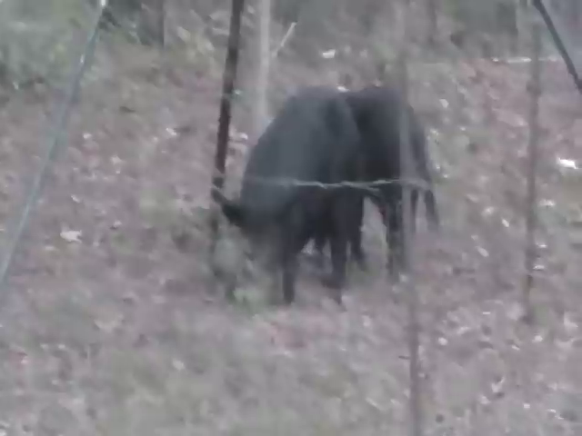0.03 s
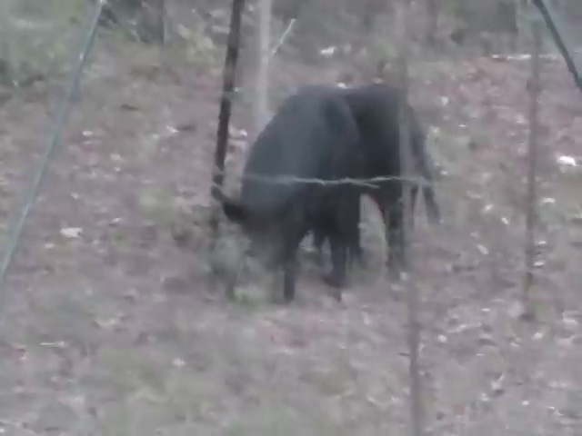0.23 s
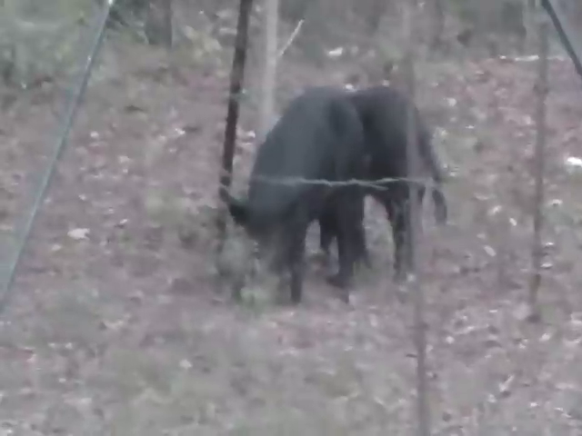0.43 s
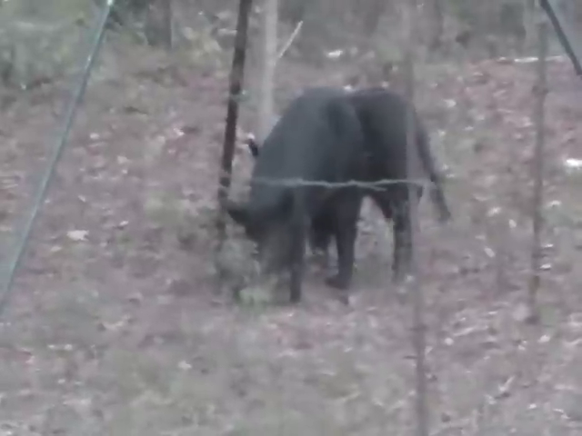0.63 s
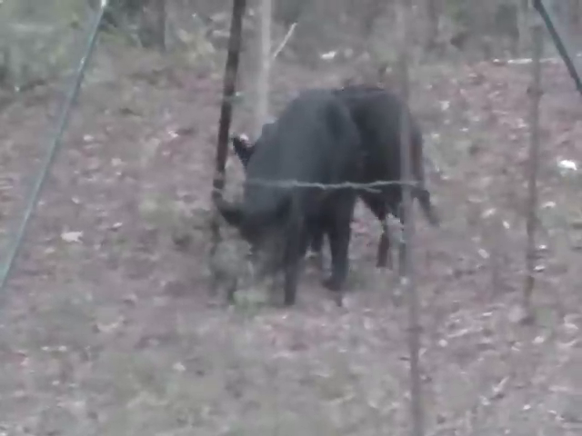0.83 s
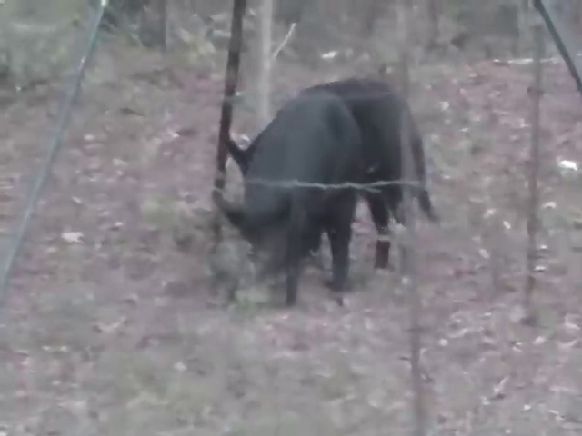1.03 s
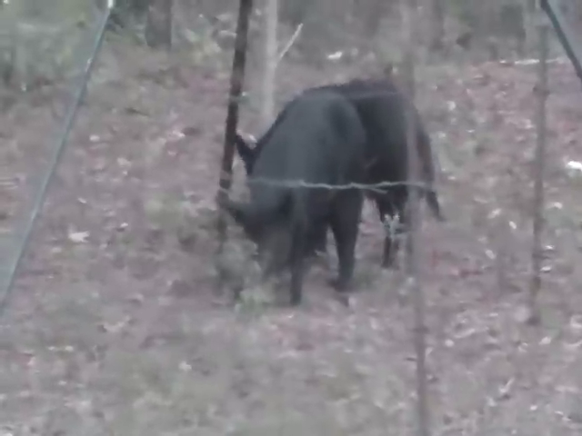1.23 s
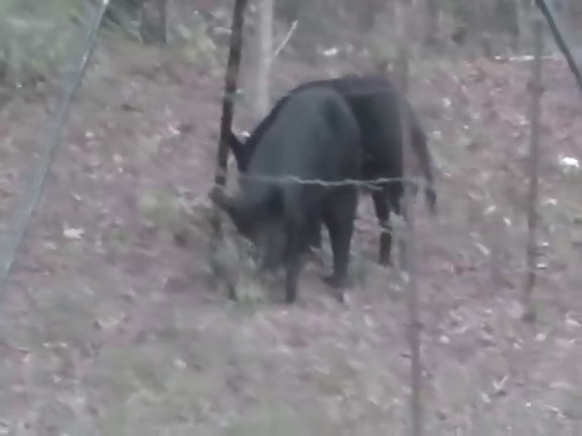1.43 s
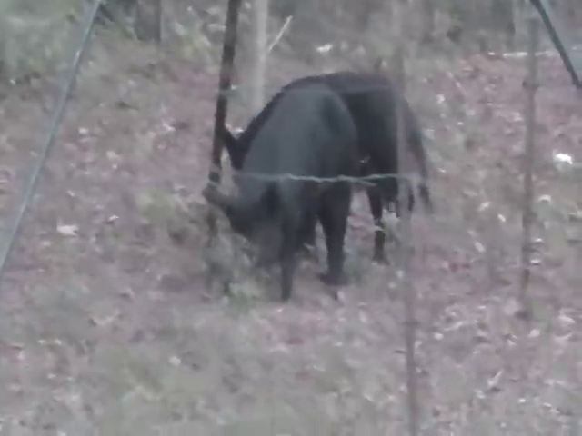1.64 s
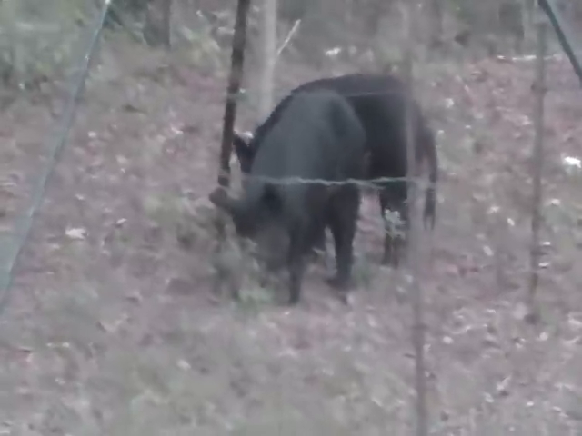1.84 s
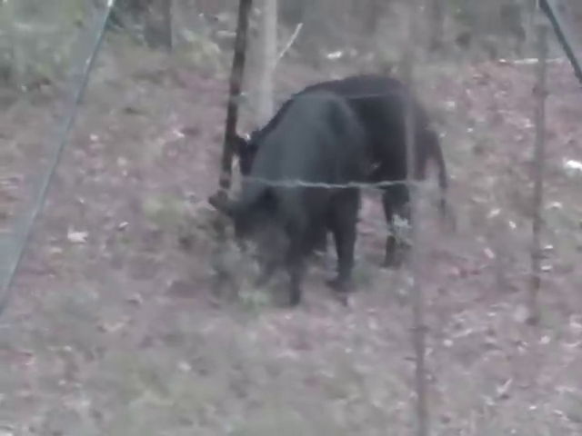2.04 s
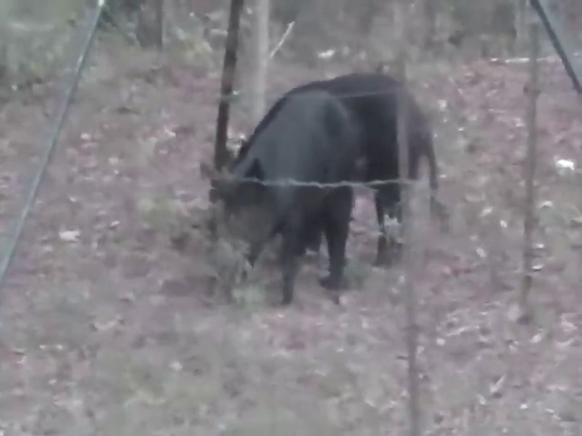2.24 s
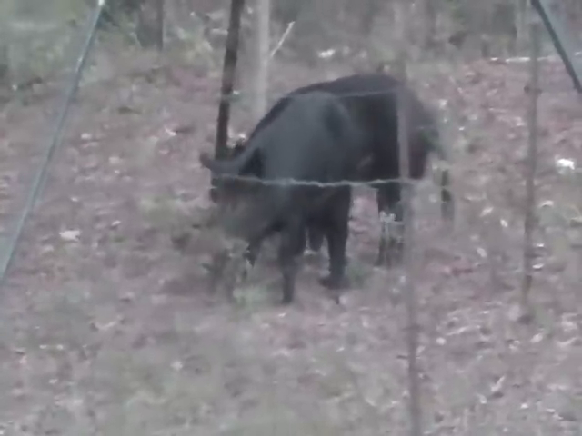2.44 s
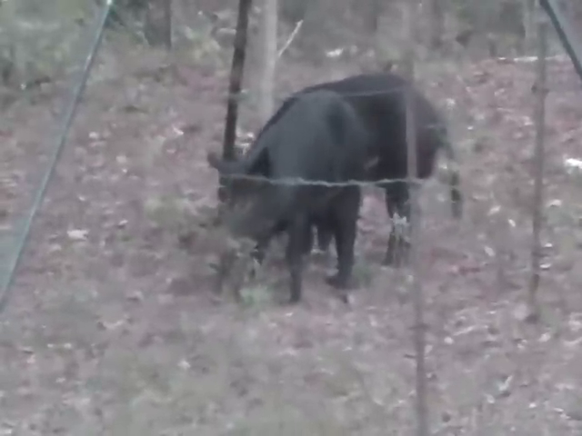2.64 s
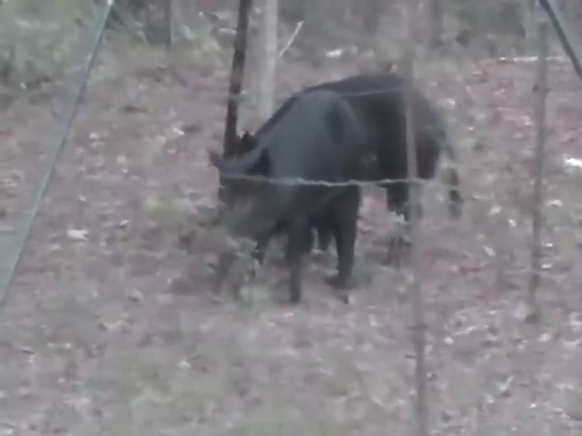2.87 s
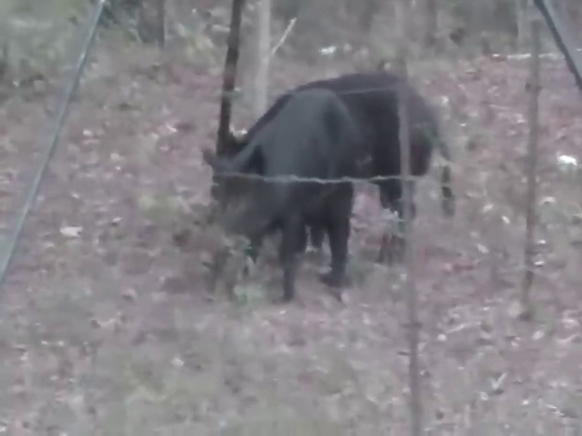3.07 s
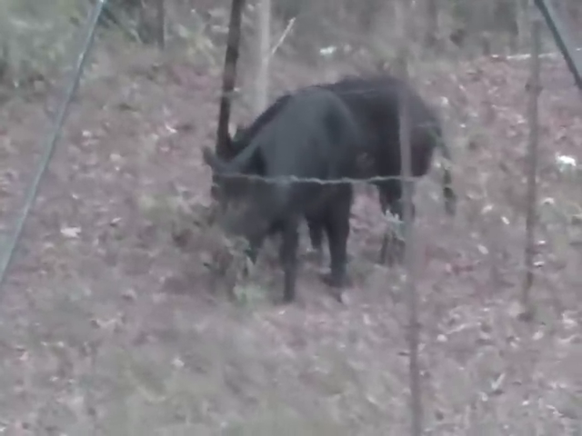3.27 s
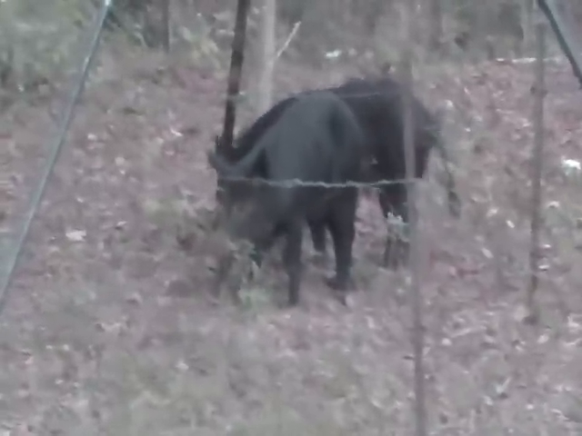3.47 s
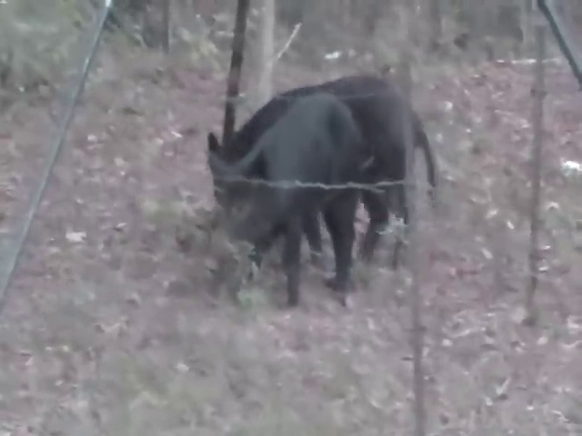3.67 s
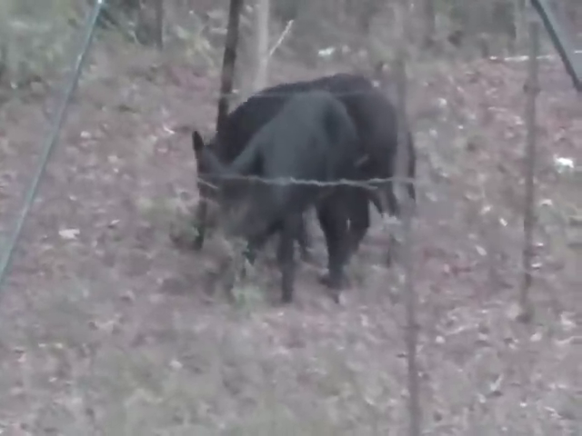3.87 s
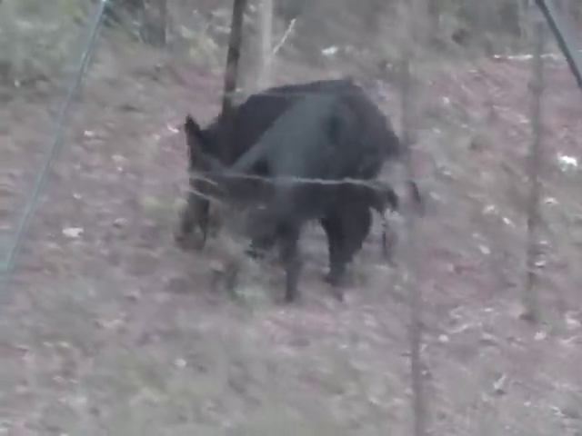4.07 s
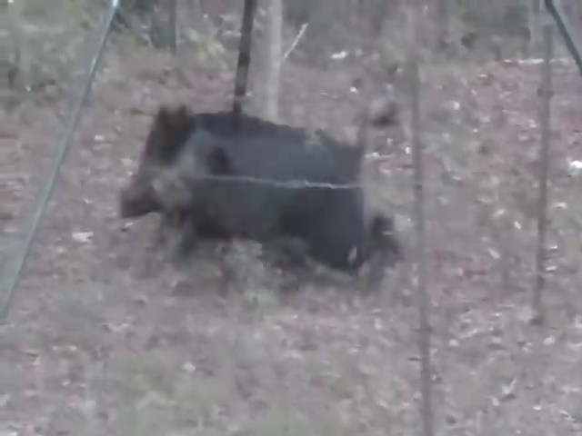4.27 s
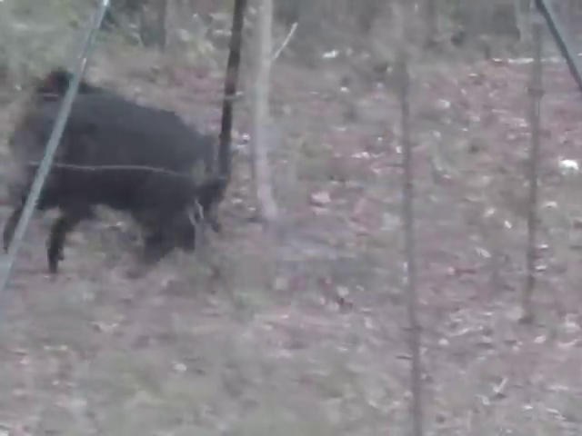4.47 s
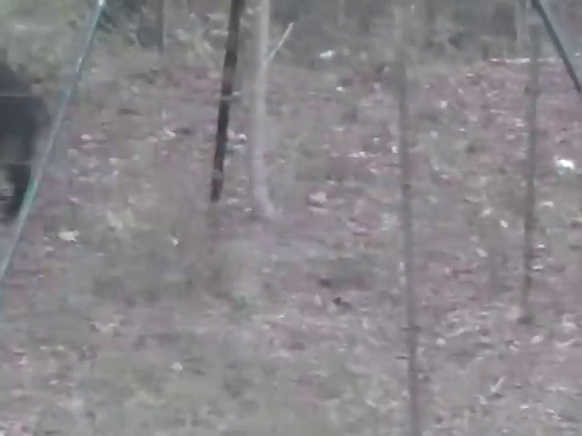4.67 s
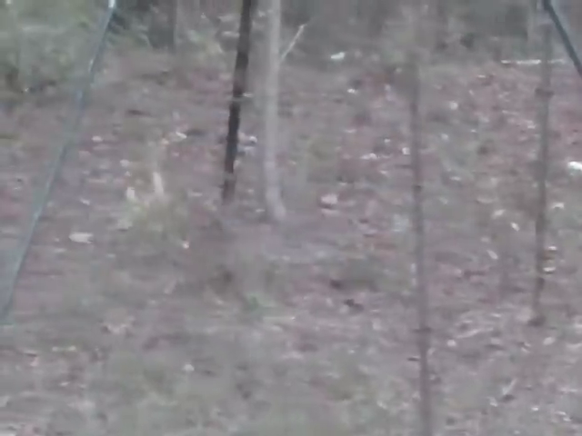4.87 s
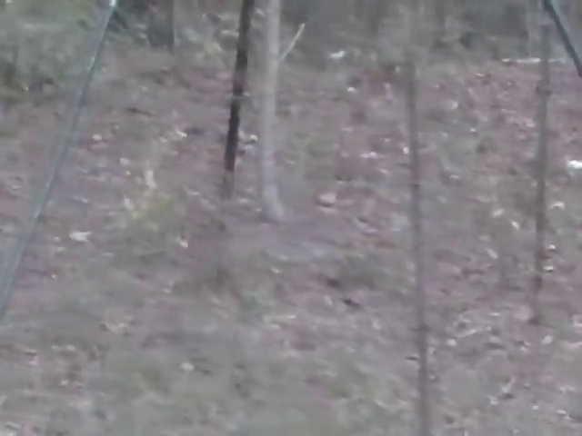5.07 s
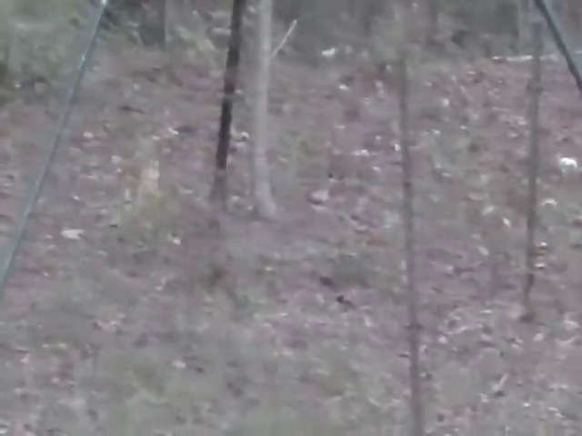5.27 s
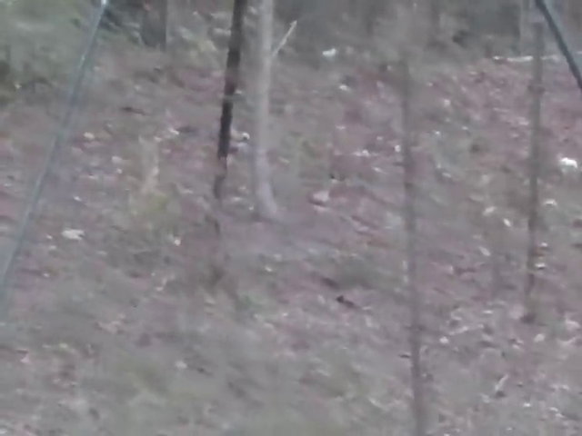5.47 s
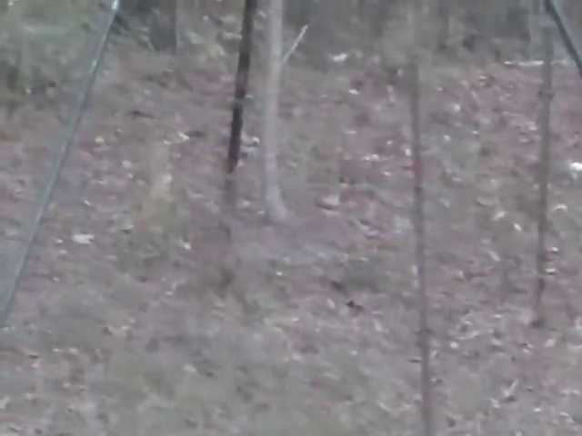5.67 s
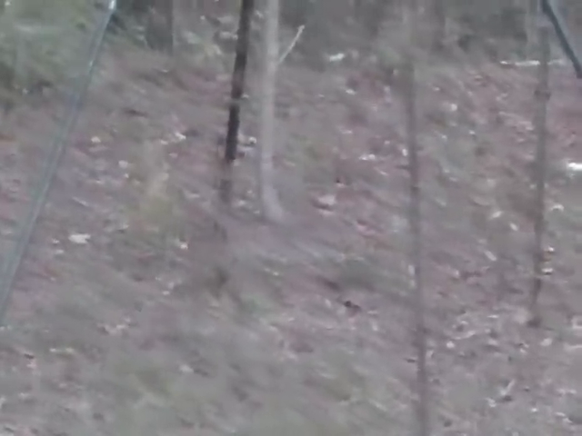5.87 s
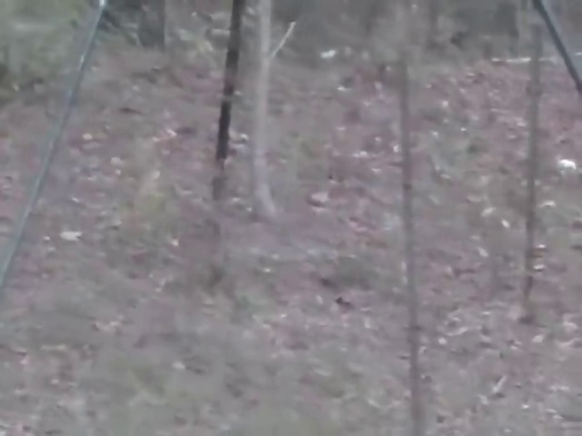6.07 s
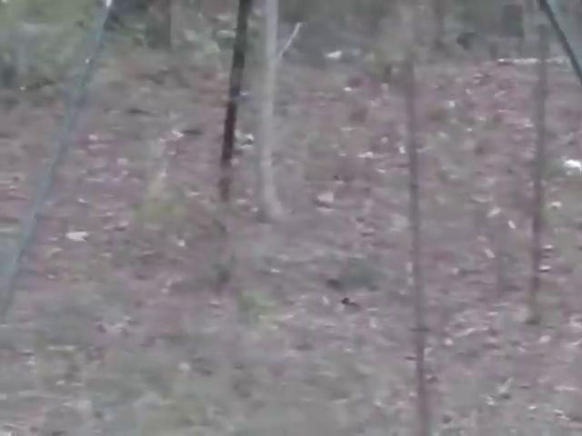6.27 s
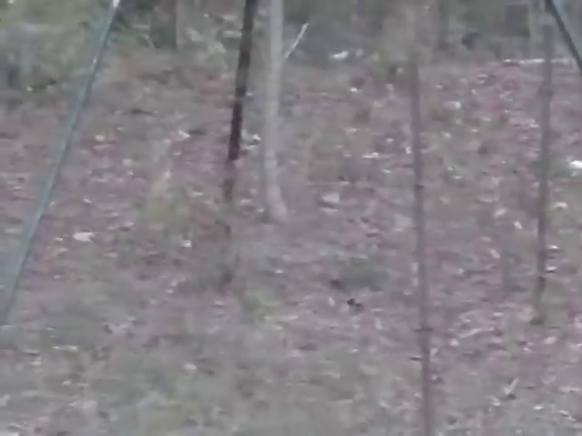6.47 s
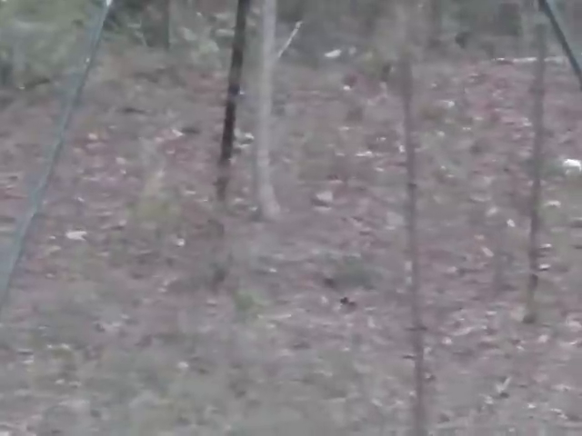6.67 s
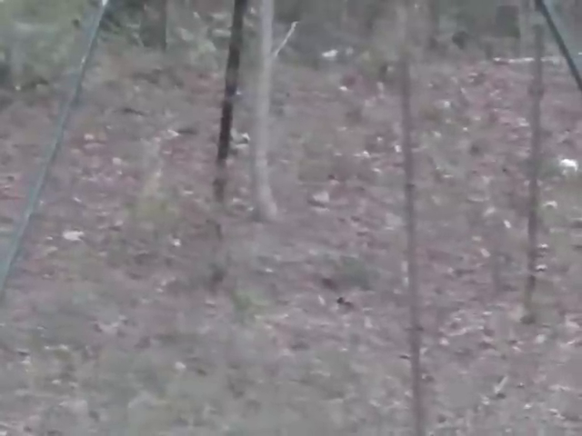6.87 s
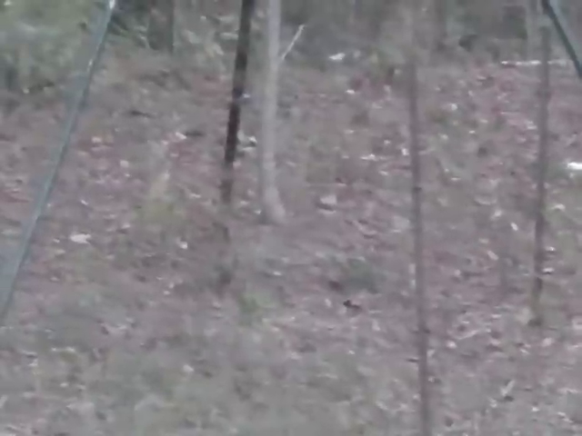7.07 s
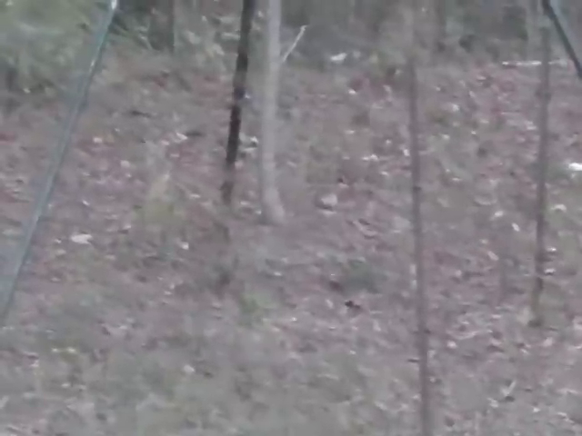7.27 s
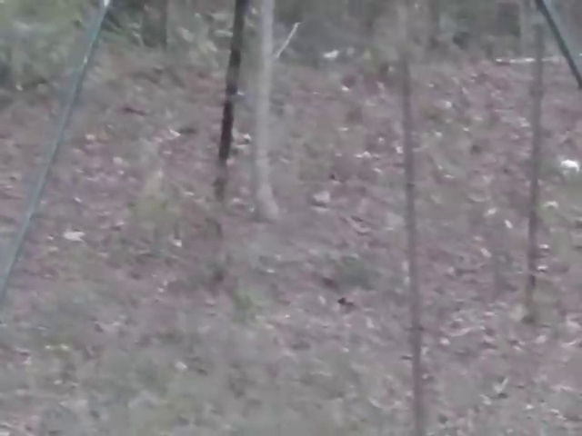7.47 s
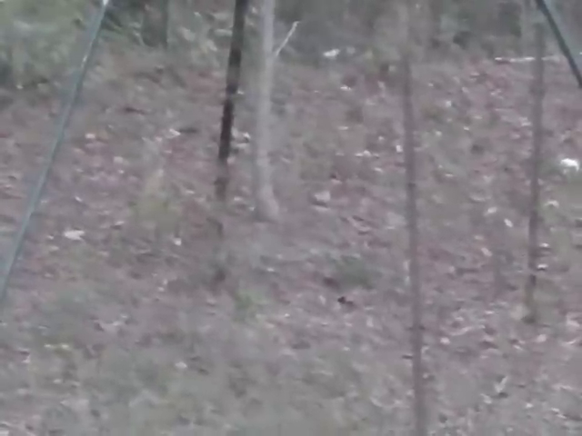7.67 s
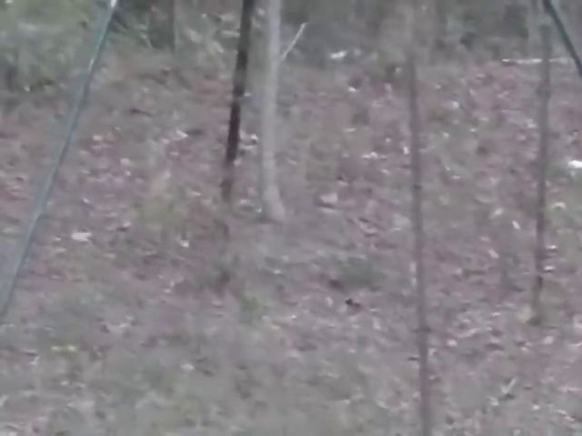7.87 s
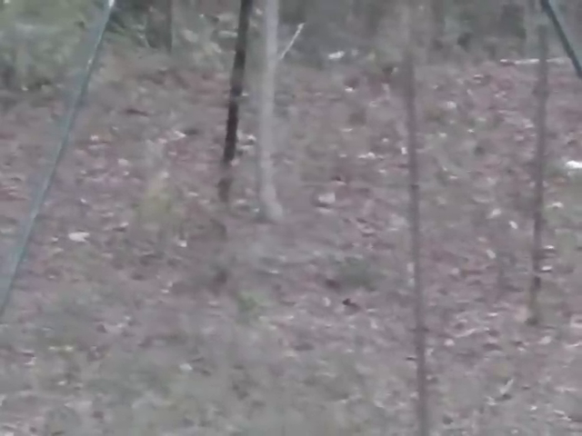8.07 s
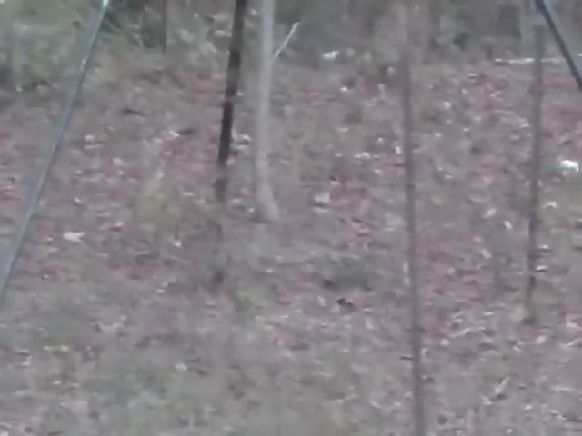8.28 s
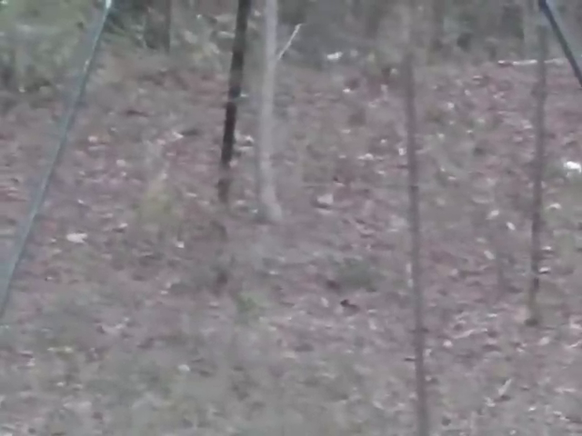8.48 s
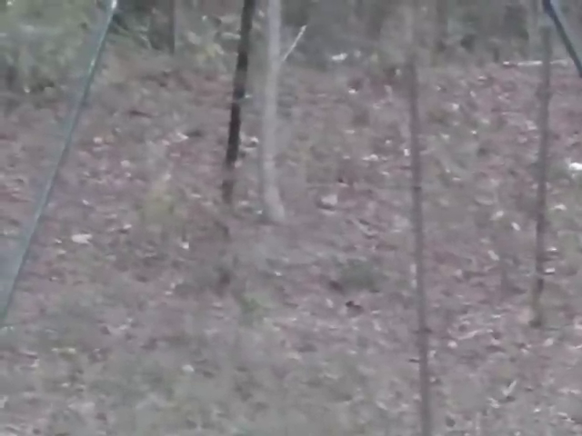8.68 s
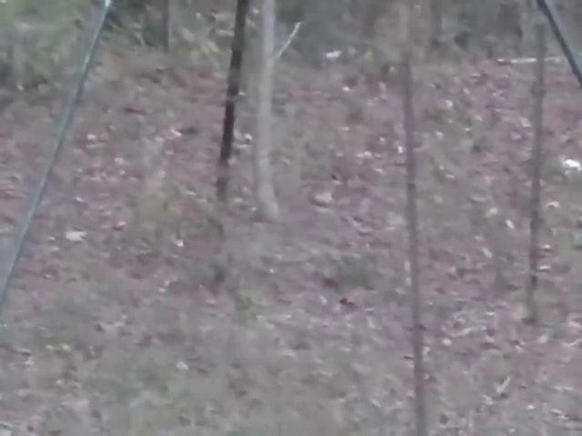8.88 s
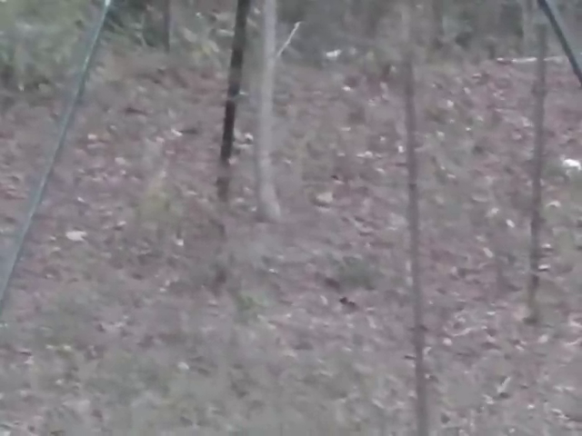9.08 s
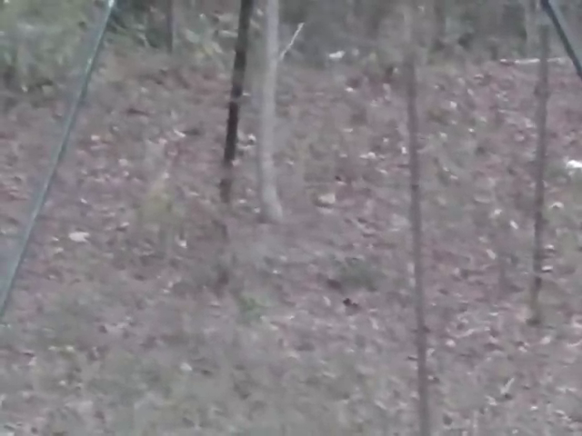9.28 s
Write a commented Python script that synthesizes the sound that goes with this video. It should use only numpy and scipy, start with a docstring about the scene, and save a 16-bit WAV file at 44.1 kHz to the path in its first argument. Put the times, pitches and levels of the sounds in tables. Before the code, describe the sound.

In a quiet wood, crickets trill over a soft airy hush while wild hogs gently rustle dry leaves and tick small twigs. A compound bow fires very close to the microphone with a sharp metallic crack and short throbbing twang. Half a second later the arrow smacks home farther off; the hogs bolt, one squeals briefly, a branch snaps loudly, and crackling footfalls recede among echoing trees.

```python
"""A wood with crickets, small birds and a faint far engine, made of falling tones, whistles, hush and a hum.
Wild hogs root in dry leaves: countless tiny clicks, coloured as leaves, stems and ground, plus thuds and twigs.
At 3.7 s a compound bow fires close by: noise cracks ring its frame, and the string twangs in throbs.
The arrow strikes half a second later and the hogs bolt through the brush. One squeals: ragged pulses and
whistles in two throat resonances. A branch breaks in noise cracks, and the herd fades among the trees."""
import sys
import numpy as np
from scipy import signal
from scipy.fft import rfft, irfft
from scipy.io import wavfile

SR = 44100
rng = np.random.default_rng(int(sys.argv[2]) if len(sys.argv) > 2 else 0)


def dump(signal):
    """Clip the signal to [-1, 1] and save it as 16-bit WAV at the path in sys.argv[1]."""
    limited = np.clip(np.atleast_2d(signal).T, -1, 1)
    pcm = np.round(limited * 32767).astype(np.int16)
    wavfile.write(sys.argv[1], SR, pcm)


N = 410571
TIME = np.arange(N) / SR

# In all tables t60/s is the time a sound takes to fall by 60 dB.
# Colours give only the shape of a spectrum; their overall power is evened out.

# colour of the still air: f/Hz, level per Hz/dB
AIR_COLOUR = [(25, -7.5), (60, -4), (110, -0.5), (200, -4.5), (330, -8), (480, -7), (800, -8),
              (2000, -12.5), (3800, -18.5), (6500, -18.5), (10000, -20.5), (15500, -28.5)]
# loudness of a far engine: t/s, level/dB
ENGINE = [(1.4, -83), (2.4, -72), (4.2, -69), (6, -80), (9.3, -75)]
# how wide a sound is, side against middle: f/Hz, level/dB
WIDE = [(60, -5), (200, 7), (700, 8), (2400, 7), (4400, 7.5), (8000, -2.5), (15000, 1)]
SCATTERED = [(100, -14), (500, -12), (1300, -14.5), (2400, -12), (4400, -18), (8000, -21), (15000, 1.5)]
NARROW = [(100, -12), (300, -17), (2000, -14.5), (5000, -25), (9000, -16), (14000, -2.5)]
# colour of what trunks and leaves send back: f/Hz, level/dB
FOLIAGE = [(60, -7), (250, -4.5), (600, 3), (1500, -1), (5000, -3), (9000, 2.5), (15000, -2.5)]

# irregular cricket chirps: t/s, strokes, f/Hz, level/dB
CHIRPS = [(.008, 5, 3260, -61.5), (.100, 2, 5010, -67), (.632, 4, 3090, -61), (.940, 2, 5010, -67),
          (1.270, 5, 3290, -62.5), (2.477, 4, 3100, -63), (3.354, 5, 3270, -63), (3.555, 3, 3090, -63.5),
          (7.770, 2, 4650, -57)]
CHIRP_SPACING_S, CHIRP_FALL_HZ = .044, 210
SWELL_DB = 5  # a chirp grows by about this much from first stroke to last
# a cricket trilling on one pitch: t/s, strokes
TRILLS = [(.502, 6), (2.736, 10)]
TRILL_SPACING_S, TRILL_HZ, TRILL_DB = .0205, 3343, -63
# crickets calling like clockwork, two strokes each: first t/s, period/s, f/Hz, fall in a stroke/Hz, level/dB
CALLERS = [(.203, .797, 4970, 400, -57), (.400, .649, 5380, 620, -61.5)]
PAIR_S = .038  # between the two strokes

# pushes through the litter, gentle in rooting, hard in running:
# t/s, hold/s, leaves level/dB, stems against leaves/dB, ground against leaves/dB (before each layer's trim)
SHOVES = [(0.198, .23, -64.5, 2.5, 3), (0.557, 0.36, -72, -3, 5), (0.973, 0.073, -58.5, -5, -8.5),
          (1.154, 0.73, -67, -2, -1.5), (2.043, 0.45, -75, 0.5, 6), (2.847, .04, -65.5, -3.5, -17),
          (3.534, 0.082, -70, 3, -2), (4.273, 0.088, -50, -1, -3), (4.515, 0.17, -45, -6, -13),
          (4.792, 0.12, -45, -5, -11), (5.018, .04, -41.5, -4.5, -16), (5.121, 0.084, -31.5, -13, -23),
          (5.194, 0.067, -28.5, -9.5, -36), (5.533, 0.096, -47.5, -10, -11.5),
          (5.818, 0.12, -44, -11.5, -14.5), (6.172, 0.28, -44, -10.5, -19), (6.515, 0.13, -49.5, -9, -27),
          (6.892, 0.16, -54.5, -7, -10), (7.01, 0.33, -51.5, -5, -8), (7.457, 0.19, -52.5, -4, -11),
          (7.72, 0.32, -54.5, -3, -14.5), (8.251, 0.24, -51, -6.5, -19), (8.61, .19, -55.5, -6.5, -14),
          (8.987, 0.25, -52.5, -7.5, -11.5)]
SHOVE_ATTACK_S, SHOVE_RELEASE_DB_PER_S = 0.027, 83
STIR_DB = -75.5  # the litter is never quite still
# the running herd; stems and ground are against the leaves
BOLT_S, GATHER_S, HERD_DB, HERD_FADE_DB_PER_S = 4.16, 1.0, -47.5, 3.5
HERD_STEMS_DB, HERD_GROUND_DB = -7, -10
RETREAT_S = 5.4  # from the bolt until the herd is far off
# colours of the litter layers: f/Hz, level per Hz/dB
LEAVES = [(1200, -33.5), (2500, -2), (3600, -3), (4500, 3), (6500, -1), (9000, -7.5), (12000, -18.5),
          (15500, -25.5)]
STEMS = [(300, -23.5), (700, -8.5), (1300, 1.5), (2400, -0.5), (3500, -3), (7000, -36)]
GROUND = [(30, -20), (70, -2), (130, 1), (360, -2.5), (490, 0), (640, -3.5), (900, -5.5), (2000, -30)]
# what distance does to the leaves: f/Hz, gain/dB
FAR_LOSS = [(100, 4), (8000, 0), (11500, -4.5), (15500, -2)]

# hooves and bumps on soft ground, and the low knock of the arrow's strike at 4.197 s: t/s, starting level/dB,
# f/Hz (the pitch sinks from 1.35 f to 0.76 f)
THUDS = [(0.289, -48, 302), (1.2638, -37.5, 310), (4.197, -27, 380), (4.541, -40, 347), (4.631, -42, 290),
         (4.705, -41, 320), (5.056, -40, 338), (6.191, -47, 300)]
# bird calls: t/s, length/s, start f/Hz, end f/Hz, level/dB, waver/Hz
BIRDS = [(0.459, 0.019, 6300, 8400, -59.5, 20), (.80, 0.19, 8500, 8100, -73, 300),
         (0.825, 0.26, 9400, 9200, -77, 240), (1.286, .08, 8100, 7800, -70, 200),
         (1.514, 0.14, 7400, 7150, -70.5, 170), (1.705, 0.017, 5900, 8700, -56.5, 20),
         (1.73, .09, 7700, 7650, -71, 130), (3.15, 0.1, 7560, 6800, -71, 200),
         (3.21, .11, 7100, 7400, -75, 350)]
# the louder twigs, and the branch's first cracks at 5.14-5.2 s before it breaks: t/s, level/dB, t60/s, centre
# f/Hz
TWIG_SNAPS = [(.598, -51, .01, 2760), (1.592, -51, .008, 2200), (2.432, -58, .02, 1500),
              (2.545, -50, .008, 3000), (2.862, -58, .02, 1500), (2.900, -57, .03, 1300),
              (3.278, -50.5, 0.0071, 3730), (3.425, -58, .03, 1400), (3.5125, -46.5, 0.0056, 2300),
              (5.137, -30.5, .034, 4970), (5.1614, -28, .015, 4700), (5.199, -18, 0.0087, 4900),
              (5.859, -39, 0.039, 5230), (6.190, -37, .044, 2800), (6.289, -38, .03, 2500),
              (6.326, -37.5, 0.017, 1400), (6.5768, -24, 0.0031, 5340), (7.176, -23, 0.0021, 5700),
              (7.613, -36.5, .006, 5000), (7.963, -38.5, 0.0089, 3200), (8.1331, -39, 0.0085, 5600),
              (8.2795, -38.5, .025, 4660), (8.427, -30, 0.006, 4520)]

# blows in the bow, from release to the string's stop: t/s, level before the frame/dB, t60/s
BOW_BLOWS = [(3.6752, -31, 0.12), (3.6865, -36.5, 0.068), (3.6912, -19, .04), (3.6944, -9, 0.04),
             (3.6966, -9, 0.034), (3.7045, -17.5, 0.055), (3.7098, -10.5, 0.025), (3.7165, -16.5, .08),
             (3.745, -30, 0.28)]
# resonances of riser, cams and arrow rest: f/Hz, width/Hz, level against each other/dB
BOW_MODES = [(1037, 42, 0), (1260, 84, -7), (1514, 34, -4.5), (2180, 120, 0.5), (2400, 290, 0.5),
             (2625, 82, -8), (2730, 60, -1.5), (3280, 130, -14), (3950, 98, -0.5), (4150, 220, 3.5),
             (4730, 130, -3), (6070, 130, -5)]
# colour of the bow's crack: f/Hz, level per Hz/dB
BOW_CRACK = [(40, -18.5), (90, -8.5), (180, -2), (400, 2.5), (900, 0.5), (1800, -3), (4200, -3.5),
             (6500, -9.5), (8500, -9), (11000, -17.5), (15500, -22)]
# string and limbs: f/Hz, level against each other/dB, pitch wobble/Hz
TWANG = [(209, -24, 26.4), (425, -15, 30), (556, -1.5, 13), (711, -9, 22)]
# loose parts chattering as the bow settles: t/s, level/dB, t60/s, centre f/Hz
RATTLES = [(3.6755, -31, 0.022, 2980), (3.739, -28, 0.039, 5960), (3.7535, -24, 0.023, 4500),
           (3.7775, -16, 0.0073, 3900), (3.8060, -21, 0.009, 3460), (3.8225, -32, 0.022, 4450)]
# the string's swing dies away in throbs
SWING_S, SWING_DB, SWING_ATTACK_S, SWING_FADE_DB_PER_S = 3.713, -8.5, 0.0073, 289.5
THROB_HZ, THROB_DB = 23.5, 12.5
# the trees' answer to a loud crack, and the dull roll among distant trunks: f/Hz, level per Hz/dB
ECHO_COLOUR = [(60, -13), (200, -6.5), (550, -10.5), (900, -10.5), (1500, 1), (2500, 1), (4500, 4.5),
               (6500, 2.5), (9000, -3.5), (12000, -14.5), (15500, -18.5)]
ROLL_COLOUR = [(40, -20), (150, -6), (450, 1), (1100, -1.5), (2000, -9.5), (5000, -34)]

# the arrow's strike: t/s, level/dB, t60/s
STRIKE = [(4.1917, -24, 0.025), (4.1938, -12, .009), (4.1982, -21.5, 0.037), (4.2135, -29.5, 0.049)]
# colour of the strike: f/Hz, level per Hz/dB
STRIKE_COLOUR = [(80, -12), (300, -3.5), (700, -4), (1500, -6.5), (2700, 4), (4000, -1.5), (6000, 4),
                 (9000, -0.5), (12000, -10.5), (15500, -21)]

# a squeal, then a faint one from far off: t/s, length/s, level/dB, lower throat f/Hz, upper throat f/Hz,
# sinking of the upper resonance/octaves per s
SQUEALS = [(4.619, .31, -46.3, 1152, 2200, 1.8), (7.73, .29, -63, 1320, 1600, .7)]
SQUEAL_ATTACK_S, LOWER_RELEASE_DB_PER_S, UPPER_RELEASE_DB_PER_S = .13, 110, 600
# the lower resonance sinks at its own rate and sounds a little later
LOWER_SINK_OCT_PER_S, LOWER_LAG_S, UPPER_DB = 0.55, 0.031, 3.5

# the branch breaking: t/s, level/dB, t60/s
BREAK = [(5.2263, -8, 0.021), (5.231, -20, 0.032), (5.239, -30, .01), (5.2455, -23, 0.014)]
# colour of the break: f/Hz, level per Hz/dB
BREAK_COLOUR = [(47, -61), (80, -38), (294, -12), (556, -21.5), (774, -5), (944, -13), (1570, -1.5),
                (3310, -5.5), (4410, 2.5), (7010, -2.5), (15500, -38)]

TOP_HZ = 15850  # nothing much is heard above this


def undb(db):
    """Turn decibels into gain."""
    return 10 ** (np.asarray(db) / 20)


def unit(x):
    """Scale to an average strength (rms) of 1."""
    return x / np.sqrt(np.mean(x ** 2) + 1e-20)


def add(out, s, sound):
    """Mix a sound in at a given time in seconds."""
    i = max(int(s * SR), 0)
    n = max(min(sound.shape[-1], N - i), 0)
    out[..., i:i + n] += sound[..., :n]


def walk(rate, size=N):
    """Smooth chance: straight lines between random points, `rate` points a second."""
    knots = rng.standard_normal(int(size / SR * rate) + 2)
    return np.interp(np.arange(size) / SR * rate, np.arange(len(knots)), knots)


def tint(x, spectrum, keep_power=True, size=2048):
    """Colour a sound through (f/Hz, level/dB) points, without any sound before its cause."""
    hz, db = np.transpose(spectrum)
    gain = undb(np.interp(np.log(np.fft.rfftfreq(size, 1 / SR) + 1), np.log(hz), db))
    # folding the cepstrum forward in time gives the filter its minimum phase
    cepstrum = irfft(np.log(unit(gain) if keep_power else gain))
    cepstrum[1:size // 2] *= 2
    cepstrum[size // 2 + 1:] = 0
    return signal.oaconvolve(x, irfft(np.exp(rfft(cepstrum))))[:len(x)]


def ring(x, hz, width):
    """One resonance, gain 1 at its centre."""
    b, a = signal.iirpeak(min(hz, SR / 2 - 1), hz / min(width, SR / 4), fs=SR)
    return signal.lfilter(b, a, x)


def lowpass(x, hz):
    """Keep what lies below a frequency."""
    return signal.sosfilt(signal.butter(2, hz, fs=SR, output="sos"), x)


def spread(mid, side, width, pan_db=0):
    """Left and right from two unrelated sounds."""
    side = tint(side, width, keep_power=False)
    return np.array([mid + side, mid - side]) * undb(np.array([[pan_db], [-pan_db]]) / 2)


def decay(t, t60):
    """An even dying away, by 60 dB in t60 seconds."""
    return np.exp(-np.log(1000) * t / t60)


def burst(t60):
    """A crack: noise that starts at once and dies quickly."""
    t = np.arange(SR // 8) / SR
    return rng.uniform(-1.07, 1, len(t)) * np.sqrt(3) * decay(t, t60)  # slightly lopsided noise


def blows(rows):
    """A noise crack for each row of (t/s, level/dB, t60/s)."""
    out = np.zeros(N)
    for s, db, t60 in rows:
        add(out, s, undb(db) * burst(t60))
    return out


def snaps(rows, breadth):
    """A crack with its own pitch for each row of (t/s, level/dB, t60/s, f/Hz)."""
    out = np.zeros(N)
    for s, db, t60, hz in rows:
        crack = burst(t60)
        snap = ring(ring(crack, hz, breadth * hz), hz, breadth * hz)
        add(out, s, undb(db) * snap * np.std(crack) / np.std(snap))
    return out


def woods(x, t60, treble_loss=0.87):
    """Echoes scattered by trunks and leaves: they build up, then fade, the treble sooner."""
    t = np.arange(2 * SR) / SR
    fade = decay(t, t60)
    tails = []
    for _ in range(2):
        uneven = rng.standard_normal(len(t)) * undb(2.4 * rng.standard_normal(len(t)))
        echoes = tint(uneven, FOLIAGE)
        low = lowpass(echoes, 4500)
        tail = fade * (low + (echoes - low) * fade ** treble_loss) * (1 - np.exp(-t / 0.023))
        tails.append(signal.oaconvolve(x, tail / np.linalg.norm(tail))[:N])
    return spread(*tails, SCATTERED)


def afterglow(x, colour, t60, treble_t60):
    """Countless unrelated echoes of a loud crack: its energy dies away as smooth noise, treble first."""
    def fading(t60):
        keep = np.exp(-2 * np.log(1000) / (t60 * SR))
        return np.sqrt(signal.lfilter([1 - keep], [1, -keep], x ** 2))
    tails = []
    for _ in range(2):
        echoes = tint(rng.standard_normal(N), colour)
        low = signal.sosfiltfilt(signal.butter(2, 4000, fs=SR, output="sos"), echoes)
        tails.append(low * fading(t60) + (echoes - low) * fading(treble_t60))
    return spread(*tails, SCATTERED)


def grains(rate, scatter_db):
    """Tiny clicks of very unequal size, about `rate` a second."""
    happens = rng.random(N) < rate / SR
    size_db = scatter_db * np.minimum(rng.exponential(size=N), 5)
    return unit(happens * rng.choice([-1, 1], N) * undb(size_db))


def note(length, from_hz, to_hz, waver_hz=0):
    """A soft-edged gliding whistle."""
    u = np.linspace(0, 1, int(length * SR))
    hz = from_hz + (to_hz - from_hz) * u + waver_hz * walk(300, size=len(u))
    return np.sqrt(2) * np.sin(np.pi * u) * np.sin(2 * np.pi * np.cumsum(hz) / SR)


def swell(start, attack, hold, release_db_per_s):
    """Loudness that rises, holds until `hold` seconds after its start, then fades."""
    t = TIME - start
    return np.clip(t / attack, 0, 1) * undb(-release_db_per_s * np.maximum(t - hold, 0))


def air(air_db=-67, engine_hz=123):
    """The wide hush of the wood is coloured noise; the far engine is one wavering tone."""
    hush = spread(*(tint(rng.standard_normal(N), AIR_COLOUR) for _ in range(2)), WIDE)
    engine = np.sqrt(2) * np.sin(2 * np.pi * np.cumsum(engine_hz + 1.91 * walk(8.1)) / SR)
    engine_s, engine_db = np.transpose(ENGINE)
    engine_level = undb(np.interp(TIME, engine_s, engine_db) + 2.2 * walk(13))
    return hush * undb(air_db + 0.67 * walk(2.1)) + engine * engine_level


def crickets(stroke_s=.025, chorus_hz=4770, haze_db=-72.0, chorus_db=-70.5):
    """A wing stroke is a tone, mostly falling as the wing slows; far callers blur into a wavering chorus."""
    near, far = np.zeros(N), np.zeros(N)

    def chirp(s, count, spacing, hz, fall_hz, db, swell_db=0):
        for k, u in enumerate(np.linspace(-.5, .5, int(round(count)))):
            stroke = note(stroke_s, hz + fall_hz / 2, hz - fall_hz / 2, waver_hz=23)
            stroke_db = db + swell_db * u + rng.normal(0, 1.2)
            add(near, s + k * spacing, undb(stroke_db) * stroke)

    for s, hz in zip(rng.uniform(0, N / SR, size=450), rng.normal(chorus_hz, 125, size=450)):
        add(far, s, note(stroke_s, hz + 110, hz - 110))
    far = unit(far) * undb(chorus_db + 2 * walk(5.6))
    # the most distant callers are only a narrow hiss
    hiss = ring(ring(rng.standard_normal(N), chorus_hz, 800), chorus_hz, 800)
    haze = undb(haze_db) * unit(hiss)
    for s, count, hz, db in CHIRPS:
        chirp(s, count, CHIRP_SPACING_S, hz, CHIRP_FALL_HZ, db, SWELL_DB)
    for s, count in TRILLS:
        chirp(s, count, TRILL_SPACING_S, TRILL_HZ, 0, TRILL_DB)
    for first, period, hz, fall_hz, db in CALLERS:
        for k in range(14):
            chirp(first + k * period, 2, PAIR_S, hz, fall_hz, db)
    return near + undb(-11) * woods(near, .4) + far + woods(haze, .3)


def movement():
    """How strongly leaves, stems and ground are stirred: single shoves on top of the running herd."""
    herd = undb(HERD_DB) * swell(BOLT_S, GATHER_S, GATHER_S, HERD_FADE_DB_PER_S)
    power = undb(STIR_DB) ** 2 + np.outer(undb([0, HERD_STEMS_DB, HERD_GROUND_DB]), herd) ** 2
    for s, hold, db, stems_db, ground_db in SHOVES:
        shove = undb(db) * swell(s, SHOVE_ATTACK_S, hold, SHOVE_RELEASE_DB_PER_S)
        power = power + np.outer(undb([0, stems_db, ground_db]), shove) ** 2
    return np.sqrt(power)


def receding(sound):
    """Distance dulls the treble little by little as the herd gets away."""
    far = np.clip((TIME - BOLT_S) / RETREAT_S, 0, 1)
    dulled = np.array([tint(channel, FAR_LOSS, keep_power=False) for channel in sound])
    return (1 - far) * sound + far * dulled


def brush(crackle_db=-12, crackle_hz=4400, crunch_db=-8, crunch_hz=2000):
    """Leaves crackle, stems scrape, hooves patter and small twigs break, all as clicks in uneven gusts."""
    in_leaves, in_stems, on_ground = movement()
    stride = walk(22)  # the layers surge together

    def litter(colour, strength, rate, scatter_db, surge_db):
        mid, side = (tint(grains(rate, scatter_db), colour) for _ in range(2))
        return spread(mid, side, SCATTERED) * strength * undb(surge_db * (stride + walk(70)))

    def breaking(hz, per_s, t60):
        cracks = signal.oaconvolve(grains(per_s, scatter_db=2), burst(t60))[:N]
        return unit(ring(ring(cracks, hz, hz), hz, hz))

    leaves = litter(LEAVES, in_leaves, rate=7000, scatter_db=3.3, surge_db=1.1)
    stems = litter(STEMS, in_stems, rate=2500, scatter_db=3.3, surge_db=1.3)
    ground = litter(GROUND, on_ground, rate=1000, scatter_db=1.0, surge_db=1.65)
    crackle = undb(crackle_db) * in_leaves * breaking(crackle_hz, per_s=30, t60=.012)
    crunch = undb(crunch_db) * in_stems * breaking(crunch_hz, per_s=15, t60=0.051)
    leafy = receding(undb(-1.58) * leaves + crackle)
    return leafy + undb(-0.9) * stems + undb(-0.77) * ground + crunch


def thuds(t60=0.028):
    """Dull knocks of a few cycles, their pitch sinking: hooves on soft ground, and the arrow's strike."""
    out, t = np.zeros(N), np.arange(SR // 10) / SR
    for s, db, hz in THUDS:
        sinking_hz = hz * (0.764 + 0.59 * np.exp(-t / 0.0066))
        phase = 2 * np.pi * np.cumsum(sinking_hz) / SR
        add(out, s, undb(db) * decay(t, t60) * np.sin(phase))
    return out + undb(-17) * woods(out, .4)


def birds():
    """Sharp rising chips and thin wavering whistles from the canopy are gliding tones with echoes."""
    out = np.zeros(N)
    for s, length, from_hz, to_hz, db, waver_hz in BIRDS:
        add(out, s, undb(db) * note(length, from_hz, to_hz, waver_hz))
    return out + undb(-4.0) * woods(out, 0.494)


def twigs(breadth=0.77, echo_db=-7):
    """Twigs snap underfoot, and the branch cracks before it gives way: short noise cracks, each round its own
    pitch, with echoes."""
    out = snaps(TWIG_SNAPS, breadth)
    return out + undb(echo_db) * woods(out, 0.98)


def swing():
    """How widely the string swings: a quick rise, then a fade in throbs."""
    t = TIME - SWING_S
    after = np.maximum(t, 0)
    throb = ((1 - np.cos(2 * np.pi * THROB_HZ * after)) / 2) ** 2
    rise = np.exp(np.minimum(t, 0) / SWING_ATTACK_S)
    return rise * undb(SWING_DB - SWING_FADE_DB_PER_S * after - THROB_DB * throb)


def bow(modes_db=4, crack_db=-3.0, limb_hz=185, limb_db=-24, limb_s=0.0053):
    """The string slams home and rattles the frame; the limbs thump, and the string twangs as it settles."""
    def frame(hits):
        ringing = sum(undb(db) * ring(hits, hz, width) for hz, width, db in BOW_MODES)
        return undb(crack_db) * tint(hits, BOW_CRACK) + undb(modes_db) * ringing

    # the flapping limbs keep changing the tension, so the pitch wobbles
    twang = np.zeros(N)
    for hz, db, wobble_hz in TWANG:
        twang += undb(db) * np.sin(2 * np.pi * np.cumsum(hz + wobble_hz * walk(160)) / SR)
    t = TIME - 3.703  # the middle of the thump
    thump = undb(limb_db) * np.exp(-(t / limb_s) ** 2 / 2) * np.sin(2 * np.pi * limb_hz * t)
    shot = frame(blows(BOW_BLOWS)) + snaps(RATTLES, breadth=.7) + swing() * twang + thump
    side = frame(blows(BOW_BLOWS))
    near_trees = undb(-20.5) * afterglow(shot, ECHO_COLOUR, 0.2, treble_t60=0.16)
    far_trees = undb(-26) * afterglow(shot, ECHO_COLOUR, 2.2, treble_t60=1.44)
    dull_roll = undb(-31.0) * afterglow(shot, ROLL_COLOUR, 1.8, treble_t60=1.2)
    return spread(shot, side, NARROW, pan_db=-2.5) + near_trees + far_trees + dull_roll


def arrow():
    """The arrow smacks home at a distance in noise cracks, so the trees answer strongly."""
    hit, side = (tint(blows(STRIKE), STRIKE_COLOUR) for _ in range(2))
    return spread(hit, side, NARROW) + undb(-4.5) * afterglow(hit, ECHO_COLOUR, 0.88, treble_t60=0.51)


def squeal(pitch_hz=170, rasp=.25, lower_width_hz=75, upper_width_hz=155, clear=0.35):
    """Ragged pulses of the larynx ring two sinking throat resonances, each with a shaky whistle at its core."""
    cycles = np.cumsum(pitch_hz * np.exp(rasp * walk(200))) / SR
    pulses = np.diff(np.floor(cycles), prepend=0) * undb(3.7 * walk(90))
    voice = pulses + 0.042 * rng.standard_normal(N)  # a little breath

    def throat(hz, width_hz):
        # shift the resonance down to 0 Hz, keep width_hz on either side, shift it back
        turn = np.exp(2j * np.pi * np.cumsum(hz) / SR)
        ragged = unit((lowpass(voice / turn, width_hz) * turn).real)
        shaky_hz = hz + .7 * width_hz * walk(250)
        whistle = unit(np.sin(2 * np.pi * np.cumsum(shaky_hz) / SR) * undb(2 * walk(120)))
        return (.75 * ragged + clear * whistle) * undb(3 * walk(40))

    cry = np.zeros(N)
    for s, length, db, lower_hz, upper_hz, sink in SQUEALS:
        t = np.clip(TIME - s, 0, length + LOWER_LAG_S)
        lower = throat(lower_hz * 2 ** (-LOWER_SINK_OCT_PER_S * t), lower_width_hz)
        lower *= swell(s + LOWER_LAG_S, SQUEAL_ATTACK_S, length - LOWER_LAG_S, LOWER_RELEASE_DB_PER_S)
        upper = throat(upper_hz * 2 ** (-sink * t), upper_width_hz)
        upper *= swell(s, SQUEAL_ATTACK_S, length, UPPER_RELEASE_DB_PER_S)
        cry += undb(db) * (lower + undb(UPPER_DB) * upper)
    return cry + undb(-15.5) * woods(cry, 0.55)


def branch():
    """A dry branch gives way and splinters in a few noise cracks, and the trees echo."""
    crack, side = (tint(blows(BREAK), BREAK_COLOUR) for _ in range(2))
    return spread(crack, side, NARROW) + undb(-6.0) * afterglow(crack, ECHO_COLOUR, 0.82, treble_t60=0.35)


def scene():
    """The wood and the rooting hogs, then the shot and the flight."""
    wood = air() + crickets() + birds()
    hogs = brush() + thuds() + twigs() + squeal() + branch()
    return wood + hogs + bow() + arrow()


def record(dry):
    """Thin the deep bass, clip at full scale and cut the top."""
    thinned = signal.sosfilt(signal.butter(2, 38, "highpass", fs=SR, output="sos"), dry)
    top_cut = signal.ellip(12, .2, 90, TOP_HZ, fs=SR, output="sos")
    return signal.sosfilt(top_cut, np.clip(thinned, -1, 1))


dry = scene()
out = record(dry)
dump(out)
```